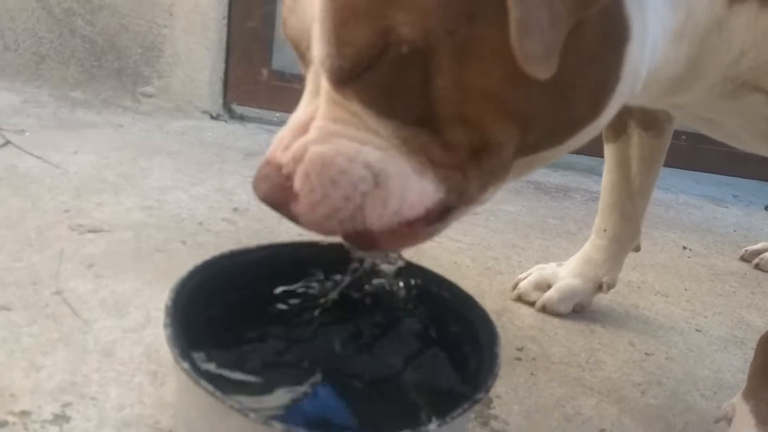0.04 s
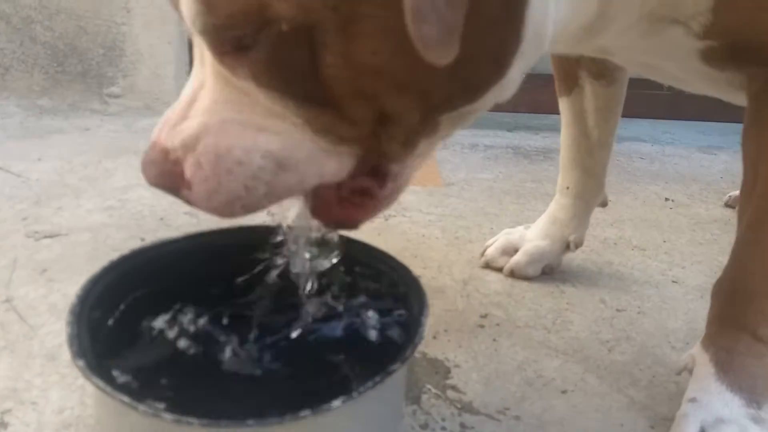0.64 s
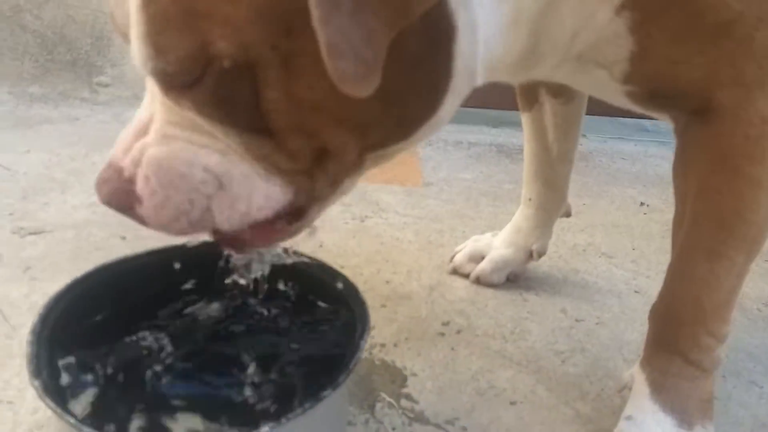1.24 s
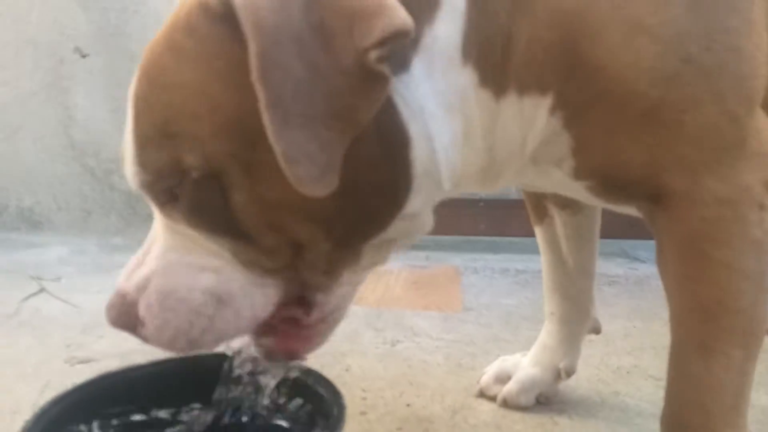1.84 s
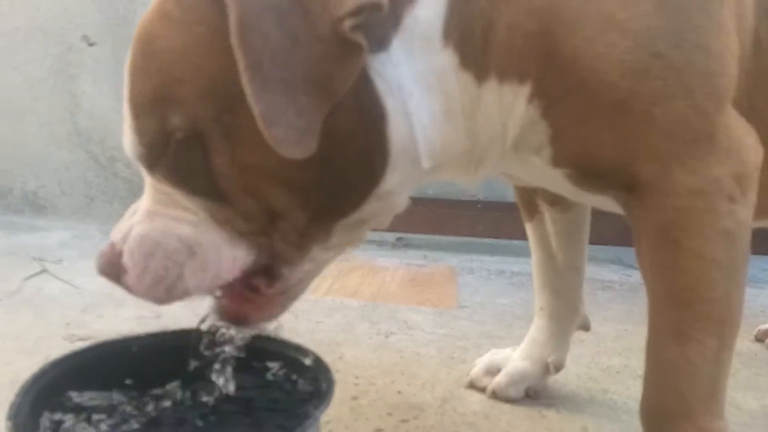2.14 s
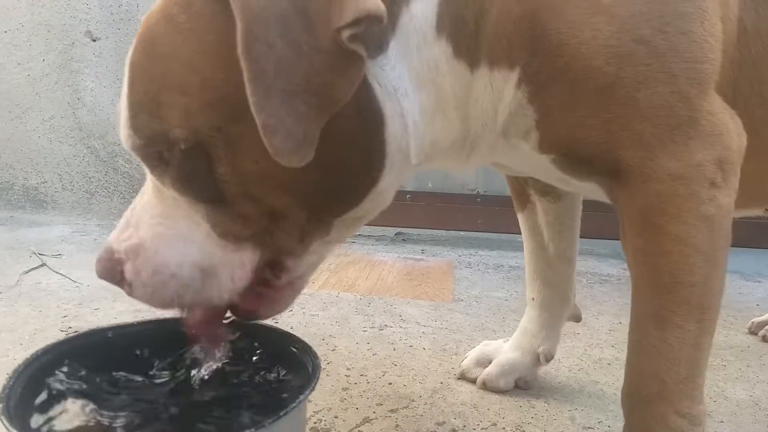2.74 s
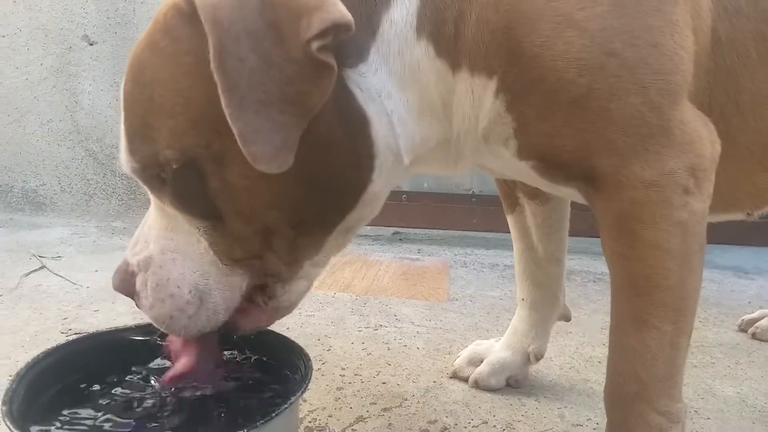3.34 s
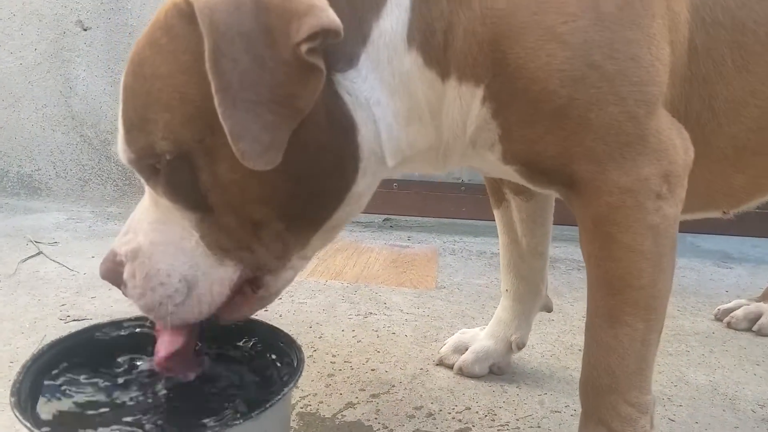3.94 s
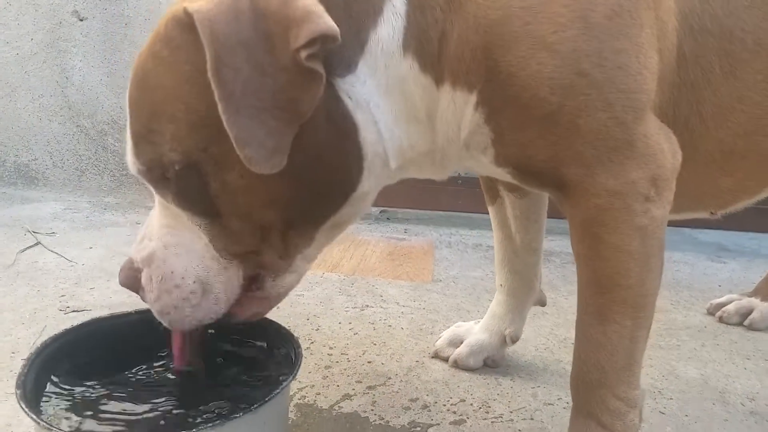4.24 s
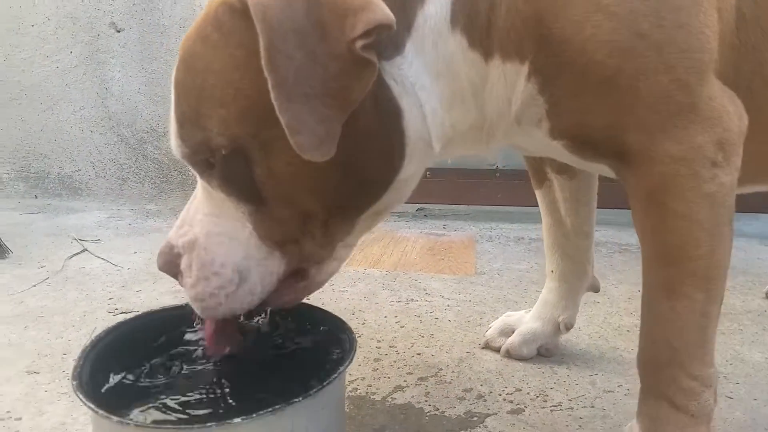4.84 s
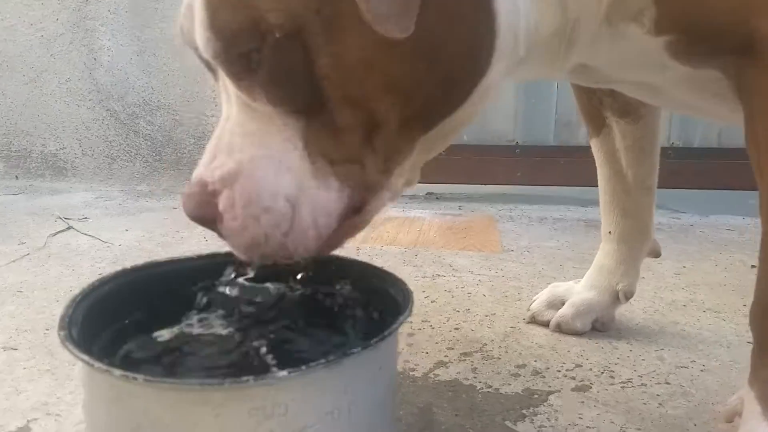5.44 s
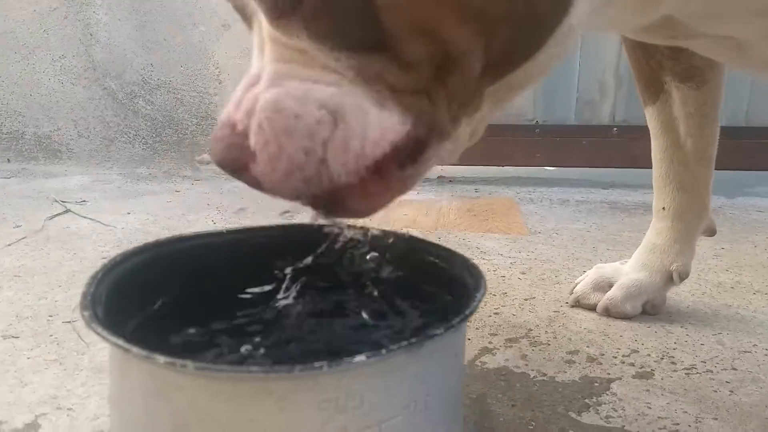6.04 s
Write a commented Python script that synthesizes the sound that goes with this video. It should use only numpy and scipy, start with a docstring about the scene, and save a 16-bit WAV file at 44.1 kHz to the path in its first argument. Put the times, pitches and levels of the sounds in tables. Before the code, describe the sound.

Close, steady lapping of a dog drinking from a pot, about three splashy licks a second, with dripping and soft swallows.

```python
"""Pops and wet smacks over quiet outdoor air: a dog laps from a metal pot, close up, about three laps a second.
Air pockets pop behind the tongue, water films peel and snap, and spilled drops patter back.
Each lap stirs the water twice: as the tongue plunges, and as the jaws clop shut on the lifted water.
A swallow follows every few laps, one mouthful gushes out, and faint tones glide in the distance.
The concrete patio and its walls answer with a short echo."""
import sys
import numpy as np
from scipy import signal
from scipy.fft import rfft, irfft, next_fast_len
from scipy.io import wavfile
from scipy.ndimage import uniform_filter1d, map_coordinates

SR = 44100
rng = np.random.default_rng(int(sys.argv[2]) if len(sys.argv) > 2 else 0)


def store_wav(level_fs):
    """Save 16-bit WAV to argv[1]."""
    pcm = np.round(np.clip(np.atleast_2d(level_fs), -1, 1) * 32767)
    wavfile.write(sys.argv[1], SR, pcm.T.astype(np.int16))


N = 273420
TIME = np.arange(N) / SR


def amp(db):
    """Decibels to gain."""
    return 10 ** (np.asarray(db) / 20)


def unit(x):
    """Scale to rms 1."""
    return x / np.sqrt(np.mean(x ** 2) + 1e-20)


def along(points, hz):
    """Read a (frequency, value) curve on a log frequency axis."""
    freqs, values = np.transpose(points)
    return np.interp(np.log(hz + 1), np.log(freqs + 1), values)


def eq(x, points, size=4096):
    """Minimum-phase EQ through (frequency [Hz], gain [dB]) points."""
    cepstrum = irfft(np.log(amp(along(points, np.fft.rfftfreq(size, 1 / SR)))))
    cepstrum[1:size // 2] *= 2
    cepstrum[size // 2 + 1:] = 0
    return signal.fftconvolve(x, irfft(np.exp(rfft(cepstrum))))[:N]


def add(track, s, sound):
    """Mix a sound into the track at time s."""
    start = int(np.clip(round(s * SR), 0, N - 1))
    track[start:start + len(sound)] += sound[:N - start]


def surge(s, rise_s, fall_s):
    """An envelope that climbs to 1 at time s and dies away."""
    age = TIME - s
    return np.exp(-np.maximum(-age / rise_s, age / fall_s))


def hump(s, half_s):
    """A bell-shaped envelope that reaches 1 at time s."""
    return np.exp(-np.minimum(((TIME - s) / half_s) ** 2, 60) / 2)


def shaped(x, envelope):
    """x under an envelope, with the energy that steady noise of rms 1 would have there."""
    return unit(x * envelope) * np.sqrt(np.mean(envelope ** 2))


def flutter(per_s, depth_db):
    """A gain of rms 1 that glides between random levels."""
    knots = rng.uniform(-1, 1, N // 40)
    return unit(amp(depth_db * map_coordinates(knots, [TIME * per_s])))


def bubble(t, hz, cycles, rise, onset):
    """A ringing air pocket: swells over `onset` cycles, dies over `cycles`, bends up as it surfaces."""
    age = t * hz / cycles
    envelope = np.exp(-age) * (1 - np.exp(-t * hz / onset))
    phase = 2 * np.pi * hz * t * (1 + rise * np.tanh(age / 2))
    return envelope / envelope.max(axis=-1, keepdims=True) * np.sin(phase)


def swarm(low_hz, high_hz, cycles, spread_db, even_s, count, samples, rise=0.035):
    """A steady stream of bubble grains of random pitch and strength, rms about 1."""
    when, pitch, life, strength = rng.random((count, 4)).T[:, :, None]
    hz = low_hz * (high_hz / low_hz) ** pitch
    gain = amp(-spread_db * np.log(strength + .015))
    grains = gain * bubble(np.arange(samples) / SR, hz, cycles * (.4 + life), rise, onset=1.7)
    slots = (when * N).astype(int) + np.arange(samples)
    stream = np.bincount(slots.ravel(), grains.ravel(), N)[:N]
    # the flow shares its energy among the bubbles within even_s
    power = np.abs(uniform_filter1d(stream ** 2, int(even_s * SR) + 1))
    return stream / np.sqrt(power + .02 * power.mean())


# Tone of the outdoor bed: (frequency [Hz], gain [dB])
AIR_EQ = [(20, -42), (29, -29), (38, 1), (52, -8), (75, 2), (150, 5.5), (300, -11), (550, -4), (1000, -3),
          (4000, -28), (16000, -15)]
def air(level_db=-59):
    """Quiet outdoor air: a steady bed of dark noise."""
    return amp(level_db) * unit(eq(rng.standard_normal(N), AIR_EQ, size=16384))


# Air pockets popping as the tongue plunges and pulls out: (time [s], level [dB], pitch [Hz])
POPS = [(0.013, -16.5, 1940), (0.018, -20.5, 1210), (0.408, -19, 2190), (0.432, -26.5, 1890),
        (0.72, -17, 2270), (0.778, -17, 2060), (0.857, -18.5, 2420), (0.913, -15, 2120), (1.048, -16, 2290),
        (1.075, -13, 2050), (1.207, -18, 1940), (1.326, -19.5, 2400), (1.542, -22, 1240),
        (1.6305, -13.5, 1153), (1.869, -19, 2390), (1.909, -25.5, 817), (2.064, -15, 2260),
        (2.247, -18.5, 2350), (2.566, -21, 2330), (2.857, -30.5, 936), (2.985, -35.5, 880),
        (2.9953, -25.5, 662), (3.066, -20.5, 2000), (3.117, -31.5, 1010), (3.221, -28.5, 1790),
        (3.403, -19.5, 2350), (3.486, -16, 2160), (3.653, -23.5, 1940), (3.724, -26, 2260),
        (3.794, -33.5, 855), (4.31, -17.5, 2430), (4.32, -26.5, 1026), (4.442, -22, 2250),
        (4.946, -17.5, 2240), (5.06, -21, 2340), (5.097, -17, 2210), (5.242, -20.5, 2090),
        (5.3825, -27.5, 1096), (5.454, -18.5, 1940), (5.663, -19, 1027), (5.725, -18, 2050),
        (5.738, -24, 1950), (5.916, -15, 2130), (6.047, -14, 1130), (6.098, -13.5, 1990)]
def pops(trim_db=-3, cycles=2.43, rise=.08, rasp_db=-17, overtone_db=-15, overtone_ratio=2.3):
    """The cavity behind the tongue closes and rings with a short chirp while its wet rim rasps."""
    track, t = np.zeros(N), np.arange(SR // 16) / SR
    for s, db, hz in POPS:
        life, chirp = rng.uniform(-1, 1, 2)
        damping = max(950 / hz, 1)  # the tongue damps large pockets, below 950 Hz
        ring = bubble(t, hz / (1 + rise), cycles * 0.96 ** life / damping, rise * (1 + chirp / 2), onset=1)
        overtone = bubble(t, hz * overtone_ratio, cycles, rise, onset=1)
        rim = signal.butter(1, [hz * .7, hz * 3], "bandpass", fs=SR)
        rasp = np.abs(ring) * unit(signal.lfilter(*rim, rng.standard_normal(len(t))))
        add(track, s, amp(db + trim_db) * (ring + amp(overtone_db) * overtone + amp(rasp_db) * rasp))
    return track


# Bright tone of flying droplets: (frequency [Hz], gain [dB])
SPATTER_EQ = [(700, -22.5), (1500, -21), (2800, -8.5), (4000, -0.5), (6000, 4), (8700, 3.5), (10000, 2.5),
              (16000, -12)]
# Resonances of the mouth: (frequency [Hz], gain [dB])
MOUTH_EQ = [(30, -47), (130, -3), (300, -10), (480, -1), (650, -4), (1000, 8), (1500, -7.5), (2100, 5.5),
            (3000, -13), (6000, -22)]
# Wet hits of tongue, lips and drops:
# (time [s], level [dB], ring pitch [Hz], thud offset [dB], spray offset [dB])
SMACKS = [(0.0178, -15.5, 5770, -11.5, -29), (0.058, -16, 5400, -35, -31), (0.088, -11.5, 7140, -34, -25),
          (0.1184, -15, 5440, -13.5, -18), (0.1506, -32, 5840, -19, -25), (0.329, -13.5, 6800, -48, -9),
          (0.3911, -19, 6000, -38, -17), (0.4015, -21.5, 4730, -8.5, -4), (0.4086, -24, 3800, -11, -1),
          (0.424, -19.5, 4130, -28, -12), (0.5702, -20, 3150, -16, -0.5), (0.655, -17.5, 3630, -29, -6),
          (0.7182, -12, 4070, -40, -10), (0.7255, -13, 8000, -40, -6.5), (0.755, -11.5, 5270, -19, -9),
          (0.855, -16.5, 3200, -22, -9.5), (0.8935, -18, 3800, -34, -8), (0.911, -15, 3650, -42, -24),
          (0.9575, -20, 6550, -10, -12), (1.0124, -15, 5150, -34, -22), (1.0565, -10.5, 5260, -32, -18),
          (1.1253, -11, 8300, -18, -13), (1.206, -8.5, 7030, -46, -34), (1.246, -15.5, 5170, -35, -27),
          (1.3058, -19.5, 5300, -15, -7), (1.4646, -14, 4900, -32, -52), (1.481, -16.5, 4800, -15.5, -9.5),
          (1.542, -17, 4070, -21, -5), (1.608, -13.5, 5720, -44, -34), (1.631, -10.5, 3550, -17, -6.5),
          (1.6768, -5, 5420, -25, -16), (1.7839, -15.5, 5220, -20.5, -11), (1.8395, -9, 8470, -29, -34),
          (1.8582, -34, 3260, -15, -16), (1.8986, -13.5, 7300, -22, -15.5), (1.9556, -14, 4050, -20.5, -21),
          (1.977, -20.5, 3600, -15.5, -6), (2.0462, -19, 7500, -41, -35), (2.0617, -18, 3330, -40, -6),
          (2.089, -17, 6660, -24, -23), (2.169, -21, 6600, -41, -8.5), (2.1822, -25, 6850, -35, -9.5),
          (2.2365, -25, 7900, -30, -8), (2.2454, -18.5, 5400, -12.5, -2.5),
          (2.4246, -23.5, 8600, -6.5, 0.5), (2.5125, -23, 4460, -22, -5.5),
          (2.5633, -18.5, 6300, -21, -7.5), (2.601, -15.5, 6150, -18, -8.5), (2.621, -19, 5640, -18, -7),
          (2.824, -16, 6900, -45, -13.5), (2.8424, -23, 5220, -10, -18), (2.894, -9.5, 5340, -29.5, -12.5),
          (2.902, -12.5, 6500, -39, -8), (2.9502, -23, 6000, -9, -8.5), (2.972, -26, 4900, -19, -3),
          (2.996, -21.5, 3020, -26, -1), (3.102, -18, 7250, -43, -9.5), (3.11, -17, 6640, -28, -18),
          (3.276, -18.5, 4800, -22, -38), (3.3098, -10.5, 8400, -24, -18), (3.321, -15, 6550, -41, -19),
          (3.33, -16, 8350, -20, -16), (3.357, -15.5, 4060, -10.5, -3.5), (3.4998, -13, 4500, -41, -5.5),
          (3.512, -15, 5960, -40, -16), (3.5425, -9, 6100, -26, -13), (3.563, -16.5, 3340, -18, -1),
          (3.639, -29, 4700, -5.5, 0), (3.757, -24.5, 5600, -25, -5), (3.8318, -14.5, 5100, -17, -5),
          (3.925, -22, 6000, -7, -4.5), (3.9315, -19.5, 6600, -11.5, -4.5),
          (4.045, -16.5, 6600, -34, -15.5), (4.0655, -25.5, 6760, -13, -7), (4.114, -25.5, 4640, -12, -8.5),
          (4.128, -26.5, 5130, -7.5, -1.5), (4.309, -25, 3450, -28, 3.5), (4.4394, -17, 6840, -43, -5),
          (4.474, -18, 5940, -38, -12), (4.485, -8, 4900, -41, -19), (4.5136, -24.5, 4540, -13.5, 1.5),
          (4.596, -24, 4500, -7.5, -10), (4.7036, -19.5, 6660, -44, -23), (4.713, -13, 6700, -51, -15),
          (4.74, -25, 6150, -34, -11), (4.779, -21.5, 5400, -10, -3), (4.8748, -10, 6400, -22.5, -19),
          (4.8889, -18.5, 8600, -24, -7.5), (4.946, -15.5, 8300, -41, -19), (4.99, -17.5, 6850, -27, -16.5),
          (5.0565, -33, 3640, -5.5, -1), (5.0688, -18, 3600, -18, -6), (5.2124, -18, 8400, -15, -16),
          (5.2326, -21, 4870, -15, -6), (5.2415, -15, 5970, -15.5, -3.5), (5.2827, -10, 6830, -29.5, -26),
          (5.3453, -28, 5400, -11, -5), (5.382, -10.5, 6360, -41, -31), (5.4244, -13, 5660, -15.5, -9.5),
          (5.4415, -22.5, 5150, -24, -5), (5.451, -14, 3430, -34, -7.5), (5.5311, -13, 3540, -14, -6),
          (5.593, -19.5, 3500, -45, -24), (5.6467, -4.5, 6330, -45, -22), (5.6641, -19.5, 4200, -12.5, -8),
          (5.7112, -18.5, 6200, -10.5, -2), (5.9094, -1.5, 8630, -25, -21), (5.9131, -12, 4120, -10, -13.5),
          (5.9579, -19.5, 5660, -10, -11), (6.038, -7.5, 7550, -46, -20), (6.0513, -16, 4580, -8.5, -14),
          (6.0875, -8.5, 8600, -17.5, -16.5), (6.1867, -19, 3930, -21, -12), (6.1938, -9.5, 7000, -23, -38)]
def smacks(ring_db=-2.5, crack_db=-11, thud_db=-3, crack_s=.00074, peel_s=.0025, spray_s=.0041):
    """A water film peels with a crackle and snaps: a crack, a tiny bubble, spray and a mouth thud."""
    rings, bright, thuds = np.zeros((3, N))
    t = np.arange(-SR // 50, SR // 20) / SR
    crack_delay_s, spray_delay_s = .0009, .0021

    def burst(rise_s, fall_s):
        return 1.5 / (np.exp(-t / rise_s) + np.exp(t / fall_s))

    droplets = swarm(1800, 14000, cycles=4, spread_db=4.2, even_s=.005, count=9000, samples=320)
    droplets *= flutter(per_s=330, depth_db=3)  # a peeling film lets go in fits
    for s, db, hz, thud_offset, spray_offset in SMACKS:
        crack_noise, thud_noise = rng.standard_normal((2, len(t)))
        cloud = droplets[rng.integers(N - len(t)):][:len(t)]
        # a small film rings higher, throws finer spray and is gone sooner
        film = signal.butter(1, [hz / 1.42, hz * 1.42], "bandpass", fs=SR)
        life = min(5500 / hz, 1.15) ** 0.35
        spray = shaped(signal.lfilter(*film, cloud), burst(peel_s * life, spray_s * life))
        crack = shaped(crack_noise, burst(crack_s / 2, crack_s)) * 2 / life
        # the mouth opens by a different amount each time, which shifts its resonances
        gape = 2 ** (.22 * rng.uniform(-1, 1))
        knock = 2 * shaped(thud_noise, burst(rise_s=.0023, fall_s=.0047))
        thud = eq(knock, [(f * gape, gain) for f, gain in MOUTH_EQ])
        add(rings, s, amp(db + ring_db) * bubble(t[t >= 0], hz, cycles=4, rise=0.03, onset=1.33))
        add(bright, s + t[0] + crack_delay_s, amp(db + crack_db) * crack)
        add(bright, s + t[0] + spray_delay_s, amp(db + spray_offset) * spray)
        add(thuds, s + t[0] + spray_delay_s, amp(db + thud_offset + thud_db) * thud)
    return rings + eq(bright, SPATTER_EQ) + thuds


# The lapping rhythm: (jaws close [s], plunge comes earlier by [s],
# plunge level [dB], spatter level [dB], slosh level [dB], clop level [dB])
LAPS = [(0.117, 0.03, -34, -42, -37.5, -40.5), (0.412, 0.035, -59, -38.5, -41.5, -62),
        (0.756, 0.19, -37, -30, -45, -38), (1.038, 0.097, -26.5, -31, -35.5, -48),
        (1.326, 0.12, -38, -33.5, -36, -45), (1.675, 0.17, -36.5, -30.5, -36, -37.5),
        (1.946, 0.056, -37, -31, -38.5, -48), (2.245, 0.11, -37, -37.5, -60, -44),
        (2.602, 0.13, -37, -39, -54, -32.5), (2.9, 0.32, -34, -33.5, -40, -48),
        (3.185, 0.12, -41, -32, -39, -43), (3.542, 0.21, -34.5, -36.5, -37, -41),
        (3.841, 0.18, -41.5, -34, -42.5, -45), (4.117, 0.21, -65, -34, -61, -42),
        (4.496, 0.19, -44.5, -32, -39.5, -46.5), (4.787, 0.086, -65, -33, -41.5, -44.5),
        (5.073, 0.074, -55, -32, -39.5, -45), (5.424, 0.19, -42.5, -34.5, -37.5, -33.5),
        (5.721, 0.093, -58, -30, -35.5, -36.5), (6.093, 0.18, -36.5, -34, -37.5, -30.5)]
def stirring(ripple_db=-50, plunge_slosh_db=-7, pause_db=-2.5):
    """Spatter and slosh envelopes: each lap swells as the tongue plunges and again as the jaws close."""
    spatter_power, slosh_power = 0, amp(ripple_db) ** 2
    for s, lead_s, plunge_db, spatter_db, slosh_db, _ in LAPS:
        plunge = amp(plunge_db) * surge(s - lead_s, rise_s=.038, fall_s=.13)
        spill = surge(s, rise_s=.07, fall_s=.045)  # the water column lifts, then the jaws cut it off
        spatter_power += plunge ** 2 + (amp(spatter_db) * spill) ** 2
        slosh_power += (amp(plunge_slosh_db) * plunge) ** 2 + (amp(slosh_db) * spill) ** 2
    # the water settles just after each swallow
    calm = amp(pause_db * sum(hump(s + .09, half_s=.04) for s, _ in SWALLOWS))
    return calm * np.sqrt(spatter_power), calm * np.sqrt(slosh_power)


# Tone of the water rocking in the pot: (frequency [Hz], gain [dB])
SLOSH_EQ = [(400, -16), (700, -12), (1000, -0.5), (1550, 4.5), (2100, 9.5), (2800, 1.5), (4000, 13)]
def water(spatter_db=-3, slosh_db=-6.5, plink_db=-7, drip_floor_db=-57):
    """Falling drops leave tiny bubbles, drips tinkle on between laps, larger bubbles slosh in the pot."""
    spatter_level, slosh_level = stirring()
    fine = swarm(2300, 13000, cycles=3.8, spread_db=3.8, even_s=.025, count=10000, samples=340)
    plinks = swarm(3300, 8200, cycles=5.5, spread_db=3.4, even_s=.08, count=750, samples=600, rise=.04)
    large = swarm(520, 3000, cycles=1.9, spread_db=3, even_s=.016, count=3600, samples=520, rise=.06)
    spatter = amp(spatter_db) * spatter_level * unit(eq(fine, SPATTER_EQ))
    drips = np.hypot(amp(plink_db) * spatter_level, amp(drip_floor_db)) * unit(plinks)
    slosh = amp(slosh_db) * slosh_level * unit(eq(large, SLOSH_EQ))
    clumps = flutter(per_s=55, depth_db=3)
    return clumps * (spatter + drips + slosh)


def jaw_clops(trim_db=-4, hz=305):
    """On every lap the closing jaws thump the air in the mouth."""
    track, t = np.zeros(N), np.arange(SR // 10) / SR
    for s, *_, db in LAPS:
        add(track, s, amp(db + trim_db) * bubble(t, hz, cycles=1.53, rise=0.029, onset=0.55))
    return track


# Gulps in the throat: (centre time [s], level [dB])
SWALLOWS = [(0.45, -48), (1.4, -48.5), (2.321, -50), (2.66, -49.5), (3.245, -48), (4.18, -48),
            (5.125, -43.5), (5.79, -49), (6.17, -50)]
def swallows(deep_db=-5, high_db=-9, offset_s=.02, half_s=.022):
    """A short gurgle steps from deep to higher as the throat narrows."""
    track = np.zeros(N)
    for delay_s, trim_db, band_hz in [(-offset_s, deep_db, (130, 220)), (offset_s, high_db, (230, 390))]:
        swell = sum(amp(db + trim_db) * hump(s + delay_s, half_s) for s, db in SWALLOWS)
        track += swell * swarm(*band_hz, cycles=1.1, spread_db=3, even_s=.03, count=600, samples=2000)
    return track


# Tone of the dense spray: (frequency [Hz], gain [dB])
GUSH_EQ = [(100, -23), (500, -15.5), (1100, -6), (2000, -16), (2800, -6.5), (4300, 2.5), (6500, 4),
           (8700, 7.5), (16000, -10)]
# Envelope of the escaping mouthful: (time [s], level [dB])
GUSH_ENVELOPE = [(0.89, -82), (0.95, -39), (1.065, -34), (1.09, -13), (1.13, -17), (1.15, -23), (1.2, -41)]
def gush(trim_db=-3.5, drops_db=1):
    """A mouthful gushes out: tiny droplets merge into a rough hiss, larger drops crackle on top."""
    times, levels = np.transpose(GUSH_ENVELOPE)
    envelope = amp(np.interp(TIME, times, levels) + trim_db)
    gate = uniform_filter1d(((TIME > times[0]) & (TIME < times[-1])) * 1.0, SR // 50)
    mist = unit(rng.standard_normal(N) * (rng.random(N) < .15))
    drops = swarm(1500, 12000, cycles=2, spread_db=4.8, even_s=.015, count=15000, samples=220)
    return gate * envelope * unit(eq(mist + amp(drops_db) * drops, GUSH_EQ))


# Faint distant tones: (centre time [s], half length [s], pitch [Hz], glide [Hz/s], level [dB])
FAR_TONES = [(1.79, 0.069, 509, 153, -54), (2.03, 0.018, 494, 150, -51.5), (2.736, 0.14, 1560, -450, -59)]
def far_tones():
    """Soft gliding tones swell and fade in the distance."""
    track = np.zeros(N)
    for s, half_s, hz, glide, db in FAR_TONES:
        t = TIME - s
        track += amp(db) * hump(s, half_s) * np.sin(2 * np.pi * t * (hz + glide * t / 2))
    return track


# Decay of the patio's tail: (frequency [Hz], time to fall 60 dB [s])
PATIO_DECAY = [(150, 0.54), (500, 0.38), (1000, 0.18), (2200, 0.15), (5000, 0.15), (9000, 0.096),
               (15000, 0.22)]
# Tone of the echo return: (frequency [Hz], gain [dB])
ECHO_EQ = [(150, -1), (600, 1.5), (1000, 4.5), (2200, 7), (5000, -0.5), (9000, -1.5), (15000, -1)]
def patio_echo(x, near_db=-7, near_s=.0035, far_db=-9, positions=16):
    """Pot and floor scatter the sound at once, the walls answer later; paths shift as the head moves."""
    echo, t = np.zeros(N), np.arange(SR // 2) / SR
    head = np.linspace(0, positions - 1, N)
    for k in range(positions):
        hz, age, spectrum = signal.stft(rng.standard_normal(len(t)), SR, nperseg=256)
        decay = amp(-60 * age / along(PATIO_DECAY, hz)[:, None])
        tail = signal.istft(spectrum * decay, SR, nperseg=256)[1][:len(t)]
        tail *= 1 - .7 * np.exp(-(t / .02) ** 2)  # soft attack
        near = rng.standard_normal(len(t)) * np.exp(-t / near_s) * (t > .0008)
        response = amp(far_db) * tail / np.linalg.norm(tail) + amp(near_db) * near / np.linalg.norm(near)
        part = np.flatnonzero(np.abs(head - k) < 1)
        crossfade = np.cos(np.pi / 2 * (head[part] - k))
        add(echo, part[0] / SR, signal.fftconvolve(x[part] * crossfade, response))
    return eq(echo, ECHO_EQ)


# Stereo width: (frequency [Hz], side level against mid [dB])
SIDE_EQ = [(60, -33), (500, -54), (1220, -34.5), (2010, -10.5), (3330, -43), (5500, -51), (9080, -17.5),
           (15000, -38)]
def scene(pop_send_db=1):
    """The lapping, its echo and the outdoor background, mixed nearly mono."""
    plops = pops()
    lapping = smacks() + water() + gush() + jaw_clops() + swallows()
    # the open pot throws the plops up at the walls
    echo = patio_echo(lapping + amp(pop_send_db) * plops)
    mid = lapping + plops + echo + far_tones() + air()
    side = eq(mid, SIDE_EQ)
    return np.array([mid + side, mid - side])


# Response of the microphone: (frequency [Hz], gain [dB])
MICROPHONE_EQ = [(1000, 3), (7000, -0.5), (8700, 1.5), (9800, -7), (13000, -1.5), (15700, -0.5),
                 (16800, -32)]
def record(dry, ceiling=.95, top_hz=16800):
    """The microphone dulls the top octave, rounds the highest peaks and passes nothing above top_hz."""
    heard = np.array([eq(channel, MICROPHONE_EQ) for channel in dry])
    rounded = heard / (1 + (heard / ceiling) ** 6) ** (1 / 6)
    size = next_fast_len(N + SR // 2)
    passband = np.fft.rfftfreq(size, 1 / SR) < top_hz
    return irfft(rfft(rounded, size) * passband, size)[:, :N]


dry = scene()
out = record(dry)
store_wav(out)
```